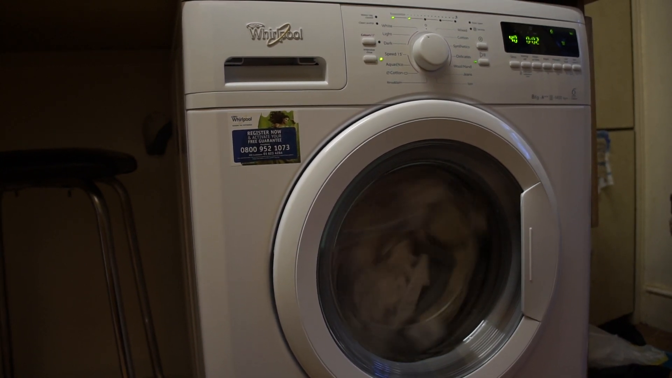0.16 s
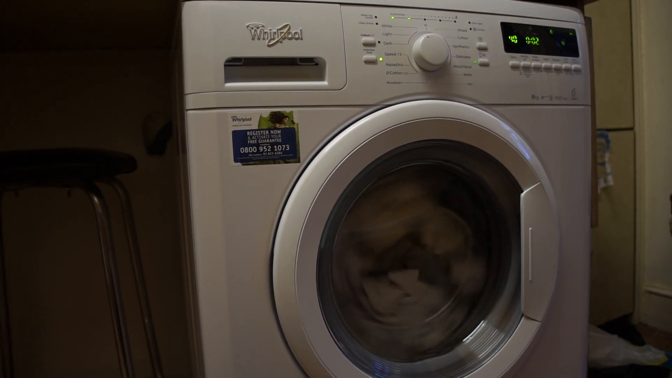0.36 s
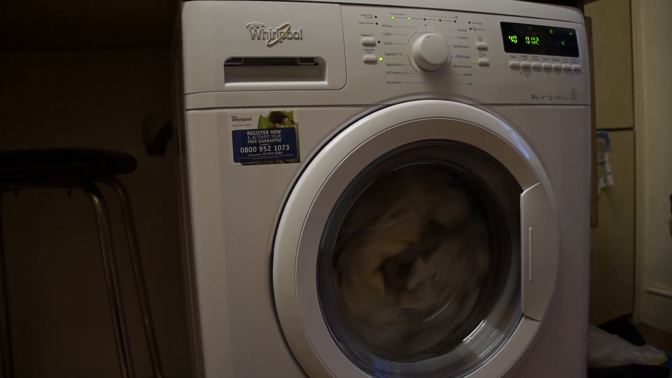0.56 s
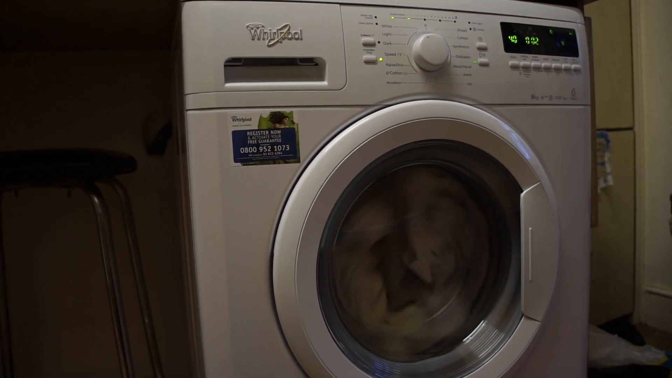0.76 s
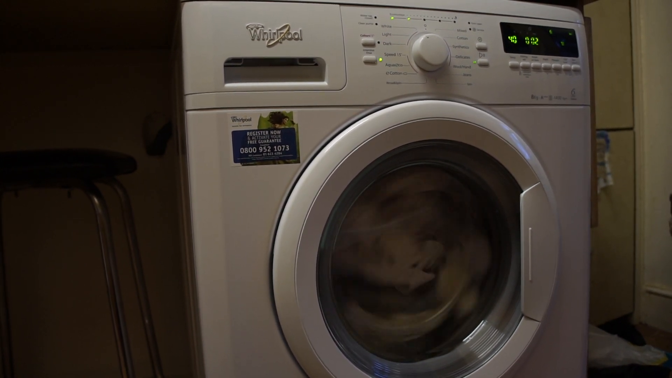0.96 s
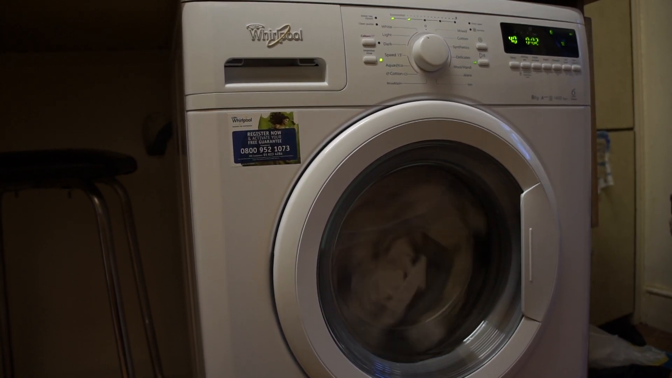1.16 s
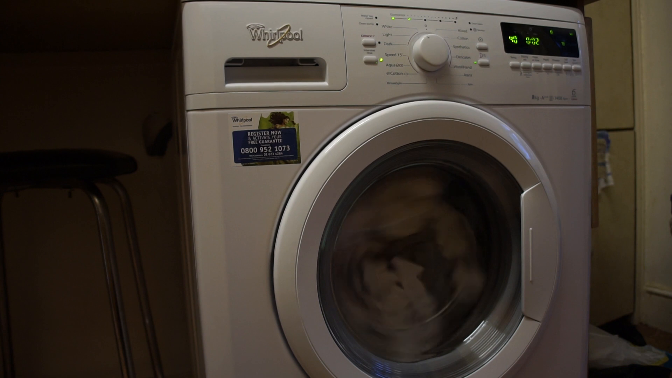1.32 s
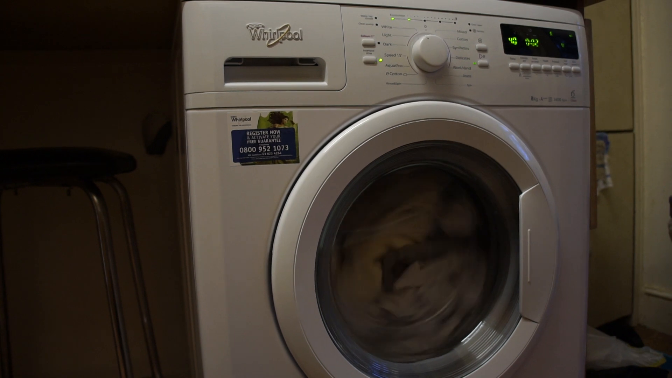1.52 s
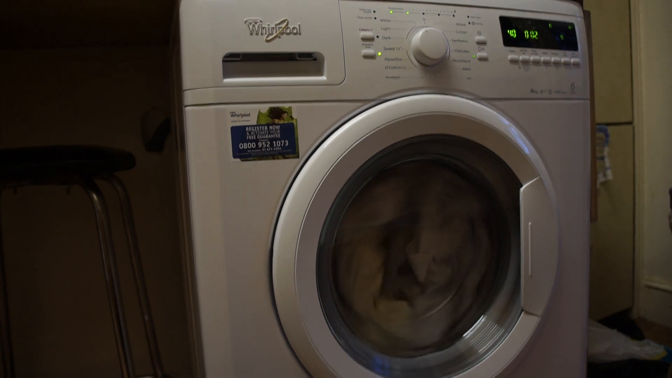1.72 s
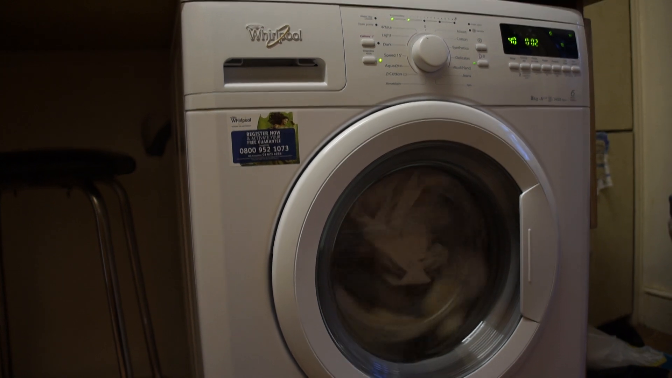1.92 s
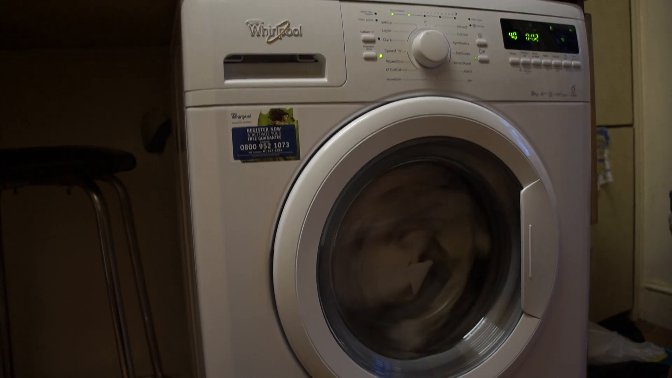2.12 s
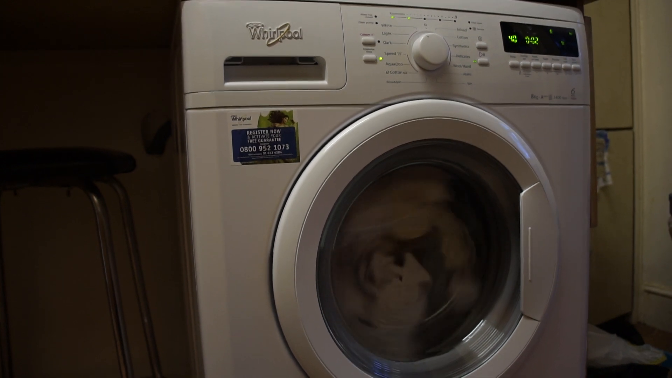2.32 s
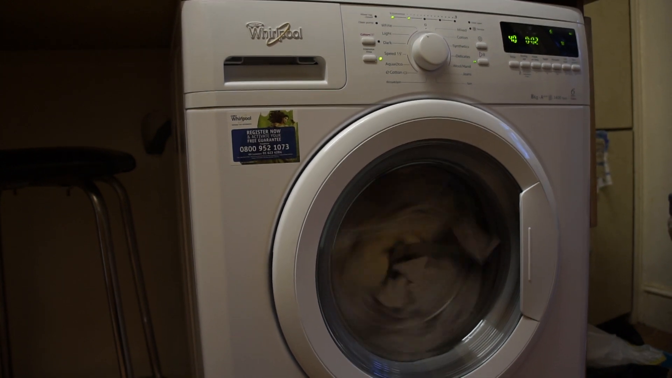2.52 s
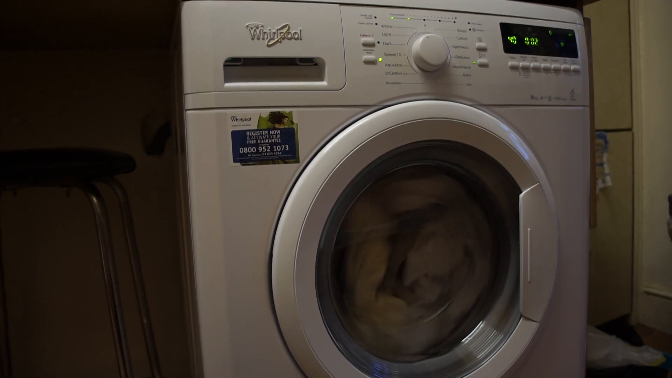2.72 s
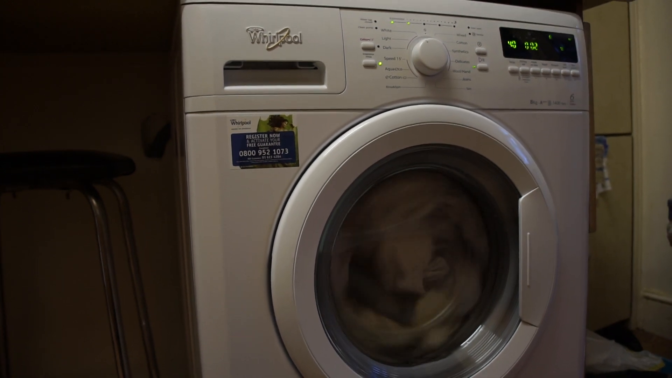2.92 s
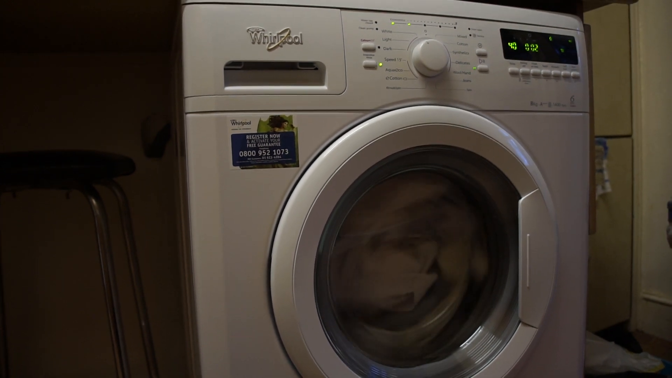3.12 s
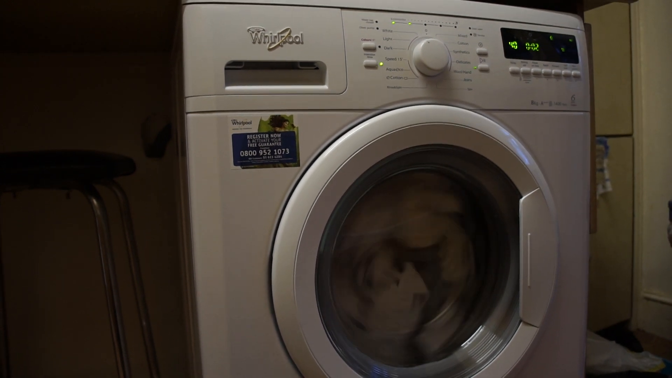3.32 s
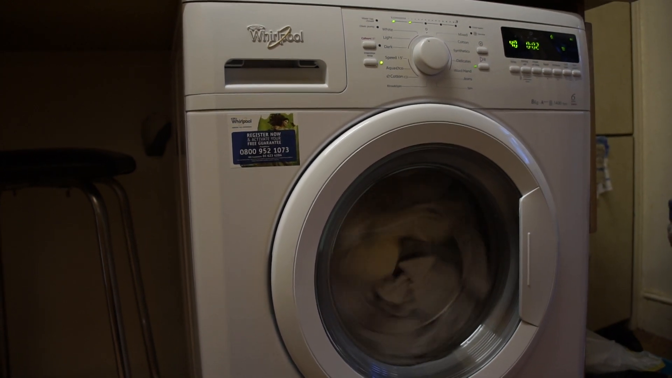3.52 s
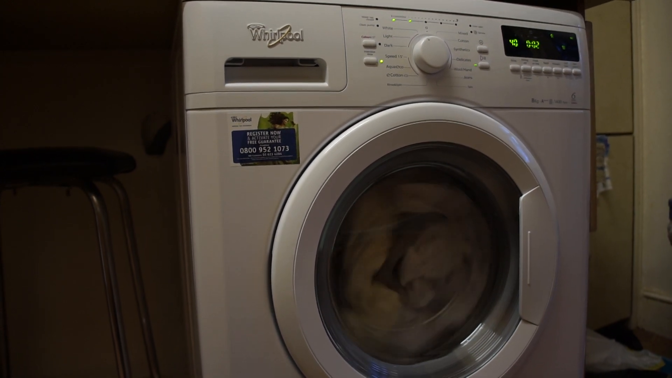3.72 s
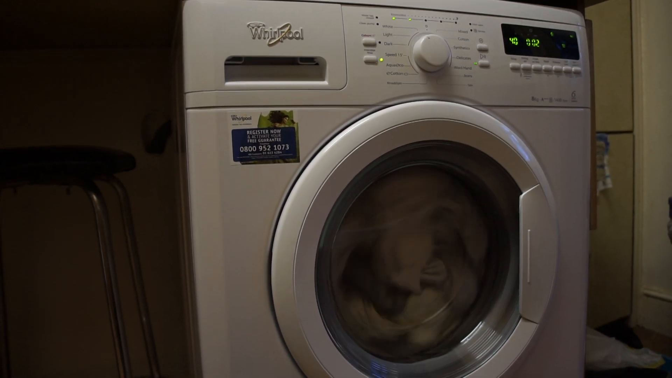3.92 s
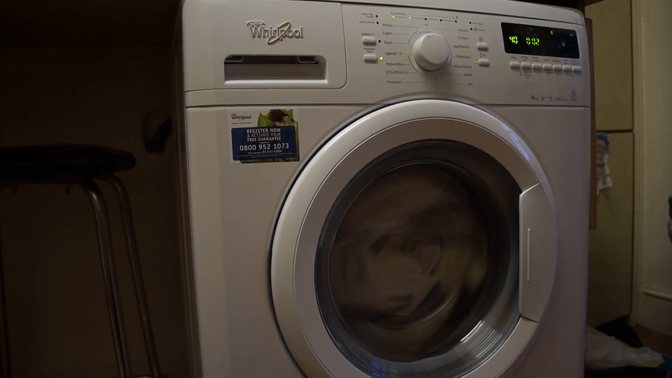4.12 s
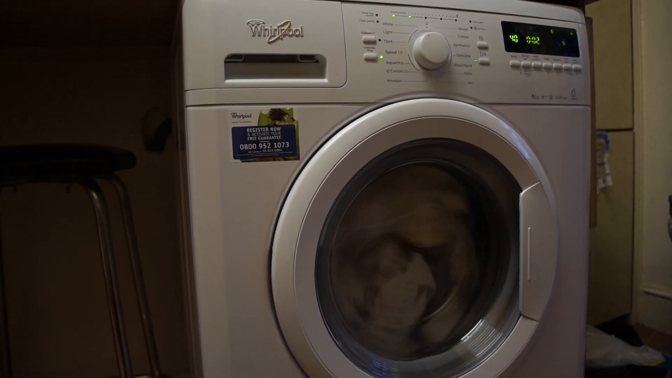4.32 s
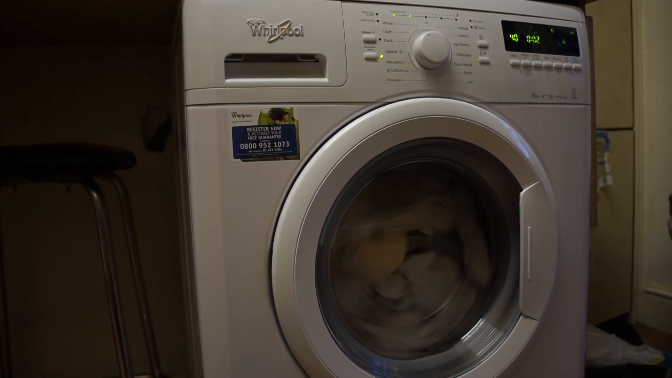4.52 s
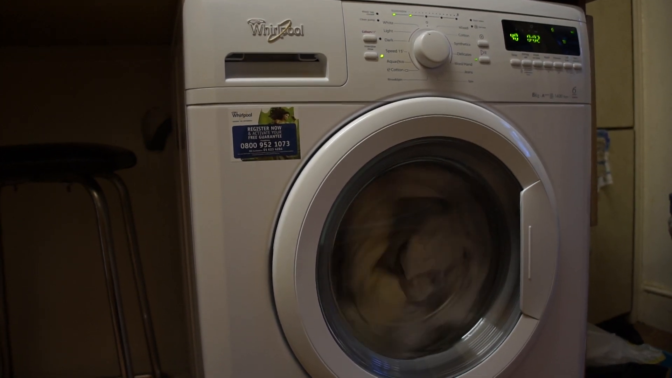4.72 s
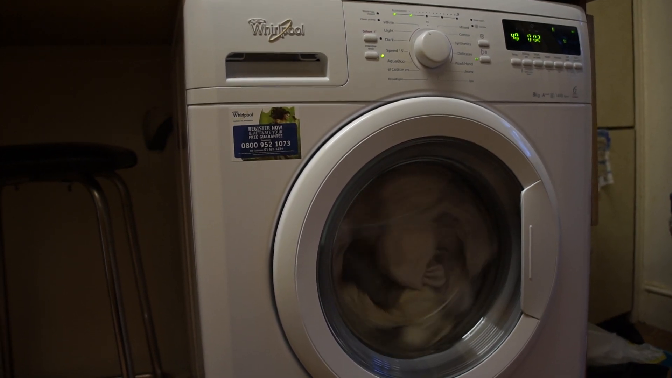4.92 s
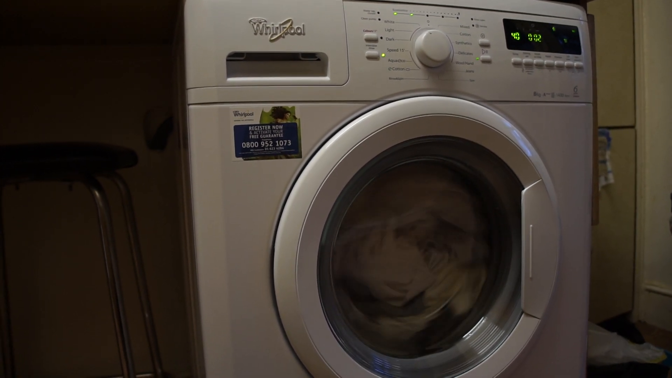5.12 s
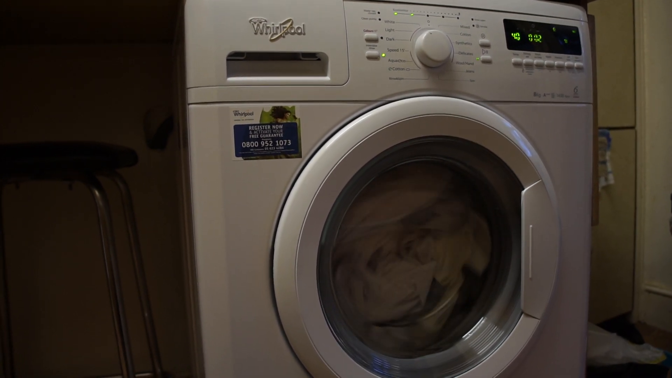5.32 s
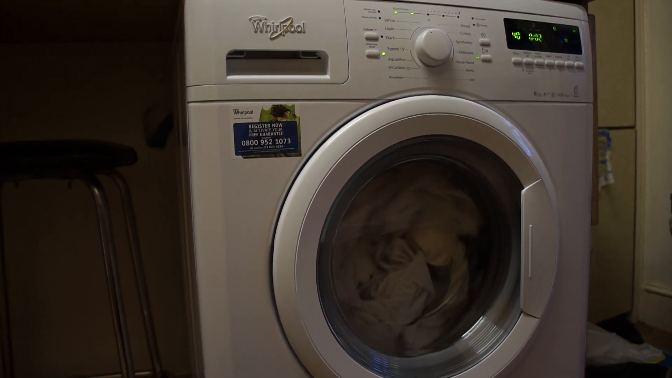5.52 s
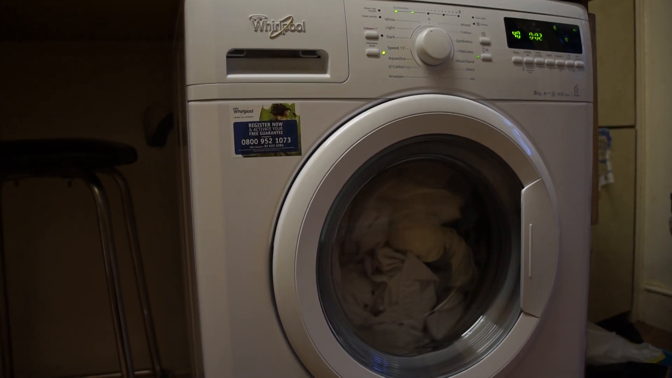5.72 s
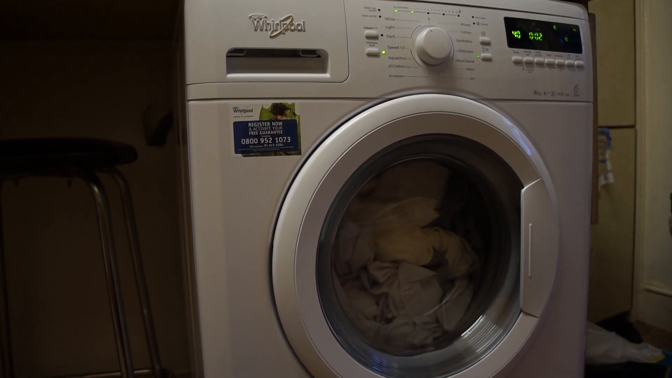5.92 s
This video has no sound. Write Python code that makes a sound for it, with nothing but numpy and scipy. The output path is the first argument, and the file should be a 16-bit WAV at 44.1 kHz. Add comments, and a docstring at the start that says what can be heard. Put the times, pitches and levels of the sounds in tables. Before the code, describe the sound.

Buzzing motor hum and a wavering nasal whine with metallic whistle and cloth swishes, then sudden power-off, a short coasting rustle and a dull thud.

```python
"""A motor hums and whines as a front-loading washing machine turns its wet load, then its power cuts out.
Chopped mains current makes the hum; the whine follows a rotor that sags as the load is lifted,
and swells where its pitch meets a mode of the cabinet. Shaped noise makes the cloth swish, rub and thud.
After the cut the drum noise sinks over about a second; one thud comes early, one just after the coast.
A low murmur of tub and room lies underneath."""
import sys
import numpy as np
from scipy.fft import rfft, irfft, next_fast_len
from scipy.io import wavfile
from scipy.ndimage import uniform_filter1d, map_coordinates

SR = 44100
rng = np.random.default_rng(int(sys.argv[2]) if len(sys.argv) > 2 else 0)


def transcribe(u):
    """Save the signal u as a 16-bit wav file named by the first command-line argument.

    u: samples, shape (n,) or (channels, n), limited to [-1, 1]; the rate is SR.
    q: integer samples, one column per channel.
    """
    v = np.clip(np.atleast_2d(u).T, -1, 1)
    q = np.round(v * 32767).astype(np.int16)
    wavfile.write(sys.argv[1], SR, q)


N = 266937
T = np.arange(N) / SR  # time [s]

MAINS_HZ = 50
CUT_S = 4.69  # the motor current stops
COAST_S = 1.07  # from the cut until the drum rests


def amp(db):
    """Decibels to gain."""
    return 10 ** (np.asarray(db) / 20)


def unit(x):
    """Scale to rms 1."""
    return x / np.sqrt(np.mean(x ** 2) + 1e-20)


def along(points, hz):
    """Read a curve of (frequency [Hz], value) points on a log frequency axis."""
    f, v = np.transpose(points)
    return np.interp(np.log(hz + 1), np.log(f + 1), v)


def curves(rows):
    """One value per sample for each column after the time."""
    s, *columns = np.transpose(rows)
    return [np.interp(T, s, column) for column in columns]


def wobble(rate):
    """A smooth random curve, rate knots a second."""
    return map_coordinates(rng.standard_normal(2048), [T * rate], mode="wrap")


def filtered(x, response):
    """x times a complex response of frequency, zero-padded so that tails do not wrap round."""
    m = next_fast_len(N + SR // 2)
    return irfft(rfft(x, m) * response(np.fft.rfftfreq(m, 1 / SR)), m)[..., :N]


def resonate(x, modes):
    """Ring x through parallel resonances (frequency [Hz], width [Hz], level [dB]) of alternating sign."""
    def response(f):
        total = 0
        for k, (centre, width, db) in enumerate(modes):
            damping = 1j * f * width
            total = total + (-1) ** k * amp(db) * damping / (centre * centre - f * f + damping)
        return total
    return filtered(x, response)


# stereo width of every noise: (frequency [Hz], left-right likeness [-1 to 1])
STEREO_LIKENESS = [(30, 0.99), (120, 0.88), (250, 0.8), (600, 0.6), (1200, 0.16), (2500, 0.14),
                   (4500, -0.12), (15000, -0.05)]


def noise(spectrum):
    """Stereo noise of rms 1: alike in the bass, nearly unrelated in the treble."""
    def mid_side(hz):
        turn = np.arccos(np.clip(along(STEREO_LIKENESS, hz), -1, 1)) / 2
        return amp(along(spectrum, hz)) * [np.cos(turn), np.sin(turn)]
    mid, side = filtered(rng.standard_normal((2, N)), mid_side)
    return unit(np.array([mid + side, mid - side]))


def tone(cycles, waver_db, spread):
    """A wavering line; the room brings it to the two ears at slightly different phases [rad]."""
    phase = 2 * np.pi * (cycles + rng.random())
    ears = spread * rng.choice([-1, 1]) * np.array([[1], [-1]])
    return amp(waver_db * wobble(9)) * np.sin(phase + ears) * np.sqrt(2)


def powered(fade_s):
    """1 while current flows, then a quick fade."""
    return np.exp(-np.maximum(T - CUT_S, 0) / fade_s)


def coasting(drop_db, fade_s, fall_db, bend):
    """Change of level [dB] after the cut: a quick step as the drive goes, then a fall as the drum slows."""
    slowed = np.clip((T - CUT_S) / COAST_S, 0, 1)
    return -drop_db * (1 - powered(fade_s)) - fall_db * slowed ** bend


def swell(s, length):
    """A bell-shaped envelope round time s."""
    return np.exp(-.5 * ((T - s) / length) ** 2)


def blow(s, t60, rise_s):
    """A soft onset at time s and an exponential decay."""
    age = np.maximum(T - s, 0)
    return (1 - np.exp(-age / rise_s)) * np.exp(-np.log(1000) * age / t60)


# rotor speed, sagging as the load is lifted: (time [s], whine pitch [Hz])
WHINE_PITCH = [(0.0, 622.7), (0.11, 633.3), (0.3, 634), (0.47, 624.9), (0.88, 619.4), (1.04, 638),
               (1.27, 637.5), (1.55, 626.5), (1.86, 616.7), (2.05, 622.5), (2.33, 626.2), (2.7, 619.6),
               (2.87, 605.8), (3.04, 620.0), (3.29, 622.7), (3.42, 625), (3.73, 625.7), (3.92, 610),
               (4.15, 626.4), (4.48, 630.7), (4.68, 619.3)]


def rotor_cycles():
    """Add up the whine pitch into a running phase in cycles, shared by all that follows the rotor."""
    pitch_hz, = curves(WHINE_PITCH)
    return np.cumsum(pitch_hz) / SR


# mains hum, before its trim: (multiple of the mains frequency [ratio], level [dB])
HUM_LINES = [(2, -66), (4, -47), (5, -62), (6, -53), (7, -53), (8, -48.3), (9, -62), (10, -60), (11, -52.5),
             (12, -63), (14, -61), (15, -62), (17, -70), (32, -68), (34, -67), (36, -58.5), (46, -69),
             (52, -71), (60, -71)]
# the hum line that beats with the whine, before its trim: (time [s], level [dB])
BEAT_LEVEL = [(0.1, -44), (0.11, -37), (0.38, -37.5), (0.43, -41.5), (0.59, -32), (0.99, -42),
              (1.01, -35.5), (2.39, -44), (3.86, -34.5), (3.88, -51), (4.04, -39), (4.51, -37.5),
              (4.53, -52), (4.66, -46)]


def hum():
    """Chopped current shakes the stator; the 13th harmonic lies by the panel's resonance and beats with the whine."""
    lines = sum(amp(db) * tone(k * MAINS_HZ * T, waver_db=0.1, spread=0.044) for k, db in HUM_LINES)
    beat_db, = curves(BEAT_LEVEL)
    near_panel = 13 * MAINS_HZ * T + .05 * wobble(12)
    beat = amp(beat_db - .5) * tone(near_panel, waver_db=2.5, spread=0.2)
    return amp(-0.6) * lines * powered(fade_s=0.014) + beat * powered(fade_s=0.052)


# cabinet modes that lift a gliding line: (frequency [Hz], width [Hz], full lift [dB])
CABINET_MODES = [(336, 9, 10), (620.5, 7, 11.5), (629.5, 5, 5), (635.5, 13, 14.2), (712, 12, 12.5),
                 (821, 16, 19), (1503, 30, 7), (1904, 30, 16.5), (2016, 28, 18)]
RING_S = 0.091  # the lift is averaged over this time


def lift_db(cycles):
    """How much the cabinet raises a line at its pitch of the moment; a quick crossing rings it only partly."""
    hz = np.gradient(cycles) * SR
    lift = sum(top / (1 + (2 * (hz - centre) / width) ** 2) for centre, width, top in CABINET_MODES)
    return uniform_filter1d(lift, size=max(int(RING_S * SR), 1))


def rotor_lines(table, cycles, waver_db, spread):
    """Rotor harmonics shifted by multiples of the mains; each swells when it meets a cabinet mode."""
    total = 0
    for order, offset, db in table:
        line = order * cycles + offset * MAINS_HZ * T
        jittered = line + 0.024 * wobble(30)
        total = total + amp(db + lift_db(line)) * tone(jittered, waver_db, spread)
    return total


# lines round the whine, before trim and cabinet lift:
# (multiple of the whine [ratio], offset [mains multiples], level [dB])
WHINE_SIDEBANDS = [(1, -6, -58), (1, -5, -56), (1, -4, -52), (1, -2, -57.5), (1, -1, -55), (1, 1, -57),
                   (1, 2, -63), (1, 3, -65), (1, 6, -69), (1, 21, -63), (2, -12, -57.5), (2, -8, -69),
                   (2, -4, -71), (2, -2, -69), (2, 2, -70), (2, 5, -70), (2, 7, -65), (2, 9, -64),
                   (2, 15, -66), (2, 19, -66), (2, 21, -66), (2, 27, -70), (3, -8, -66), (3, 0, -69),
                   (3, 2, -71), (3, 3, -67), (3, 4, -65), (3, 6, -67), (5, -3, -69)]
WHINE_DB, SIDEBAND_DB = -46.5, 1  # whine level before cabinet lift, trim of the sidebands


def whine(cycles):
    """The rotor's tone; the pulsing current puts sidebands round it at mains spacing."""
    jitter = .028 * wobble(35)
    carrier = amp(WHINE_DB + lift_db(cycles)) * tone(cycles + jitter, waver_db=0.8, spread=0.14)
    sides = amp(SIDEBAND_DB) * rotor_lines(WHINE_SIDEBANDS, cycles, waver_db=1.9, spread=0.3)
    return carrier * powered(fade_s=0.046) + sides * powered(fade_s=0.024)


# the pair that whistles in the steel:
# (multiple of the whine [ratio], offset [mains multiples], relative level [dB])
WHISTLE_PAIR = [(4, -12, 0), (4, -10, 0)]
WHISTLE_DB = -58.5  # before cabinet lift
# thin steel parts round the motor: (frequency [Hz], width [Hz], relative level [dB])
STEEL_MODES = [(1440, 44, -22), (1740, 36, -35), (1850, 25, -1), (1988, 62, -4), (2165, 27, -16)]
# the two longest-ringing modes of the steel: (frequency [Hz], width [Hz], relative level [dB])
LONG_STEEL_MODES = [(1901, 12, -4), (2011, 16, 0)]
# colour of the rubbing rasp, also heard in running_noise: (frequency [Hz], relative level [dB])
RASP_COLOUR = [(700, -52), (1000, -7.5), (1300, -1), (1550, 0), (1800, 2), (2100, 3), (2400, 1),
               (2750, -0.5), (3050, -0.5), (3500, -9.5), (4500, -11), (7000, -30)]


def steel(cycles):
    """Two sidebands whistle whenever the speed tunes them to the steel; brush friction rings all its modes."""
    whistle = amp(WHISTLE_DB) * rotor_lines(WHISTLE_PAIR, cycles, waver_db=4.1, spread=0.11)
    friction = noise(RASP_COLOUR) * amp(3.2 * wobble(18))
    scrape = amp(-50.5) * unit(resonate(friction, STEEL_MODES))
    ring = amp(-48) * unit(resonate(friction, LONG_STEEL_MODES))
    flutter = amp(1.67 * wobble(29.974))
    return ((whistle + scrape) * powered(fade_s=0.031) + ring * powered(fade_s=0.077)) * flutter


# wet cloth sliding in the drum: (time [s], level [dB], length [s])
SWISH_EVENTS = [(0.246, -47, 0.064), (1.28, -43.5, 0.051), (2.094, -44, 0.0069), (2.273, -47.5, 0.077),
                (3.277, -47.5, 0.057), (4.246, -45.5, 0.044), (4.667, -51, 0.022), (5.248, -47, 0.047),
                (5.825, -54, 0.029)]
# colour of sliding cloth, which also drives the shell clank: (frequency [Hz], relative level [dB])
SWISH_COLOUR = [(200, -26), (600, 4.5), (1500, -2.5), (3000, 0), (5200, -2), (7500, -12), (15000, -11)]


def cloth_slide():
    """Wet cloth slides in the drum: bell-shaped swells of one soft noise."""
    return noise(SWISH_COLOUR) * sum(amp(db) * swell(s, length) for s, db, length in SWISH_EVENTS)


# the load falling on the drum: (time [s], thud level [dB], shell clank level [dB], t60 [s])
THUD_EVENTS = [(1.267, -36.5, -39, 0.5), (6.005, -38.5, -41, 0.64)]
# colour of the thud: (frequency [Hz], relative level [dB])
THUD_COLOUR = [(20, -6.5), (45, -22), (85, -4.5), (135, -18), (220, -8.5), (400, -17), (800, -20),
               (1300, -24), (2400, -28.5), (6000, -33)]
# the drum shell under a blow: (frequency [Hz], width [Hz], relative level [dB])
SHELL_MODES = [(1440, 73, -2.5), (1660, 220, 1), (2020, 120, -3), (2190, 200, -8)]


def load_fall():
    """The load drops on the drum: a dull thud and the clank of the shell decay together."""
    thud = noise(THUD_COLOUR)
    clank = unit(resonate(noise(SWISH_COLOUR), SHELL_MODES))
    total = 0
    for s, thud_db, clank_db, t60 in THUD_EVENTS:
        body = amp(thud_db) * thud + amp(clank_db) * clank
        total = total + body * blow(s, t60, rise_s=0.00067)
    return total


# the tub on its springs and the cabinet it rings: (time [s], level [dB], pitch [Hz], t60 [s])
BUMP_EVENTS = [(1.283, -45, 86, .55), (1.28, -43, 134, .3), (4.845, -47, 60, .14), (5.04, -51, 190, .4),
               (5.03, -49, 632, .4), (5.4, -50, 55, .18), (5.52, -56, 50, .1), (5.98, -45, 45, .4)]


def tub_bumps():
    """The tub bumps on its springs and rings the cabinet: decaying sines."""
    total = 0
    for s, db, hz, t60 in BUMP_EVENTS:
        total = total + amp(db) * blow(s, t60, rise_s=0.0024) * np.sin(2 * np.pi * hz * (T - s))
    return total


# cloth squeaking on the door seal: (time [s], level [dB], pitch [Hz], length [s])
SQUEAK_EVENTS = [(2.213, -44.5, 1080, 0.0062), (2.31, -49, 1050, .006), (5.087, -52, 1046, 0.007)]


def squeaks():
    """Cloth squeaks on the seal: short stick-slip notes of unsteady pitch."""
    slip = .12 * wobble(160)
    total = 0
    for s, db, hz, length in SQUEAK_EVENTS:
        note = np.sqrt(2) * np.sin(2 * np.pi * (hz * T + slip))
        total = total + amp(db) * swell(s, length) * note
    return total


# low drum rumble: (frequency [Hz], relative level [dB])
RUMBLE_COLOUR = [(20, -41), (50, -48), (90, -7.5), (130, -16.5), (200, -0.5), (260, -4.5), (330, -2),
                 (470, -7.5), (560, -4.5), (720, -6.5), (850, -8.5), (1100, -14.5), (1600, -28)]
# the side panel: (frequency [Hz], width [Hz], relative level [dB])
PANEL_MODES = [(630.4, 24, 0)]


def running_noise():
    """Drum and bearings rub on while the machine coasts, and keep the side panel ringing."""
    rumble_db = -48.5 + 1.3 * wobble(4.1) + coasting(drop_db=3, fade_s=.07, fall_db=10.5, bend=2.1)
    rasp_db = -46.8 + 0.98 * wobble(10) + coasting(drop_db=7.5, fade_s=0.057, fall_db=6.5, bend=1.0)
    panel_db = -42.5 + 1.4 * wobble(3.98) + coasting(drop_db=9.5, fade_s=0.045, fall_db=9.0, bend=1.0)
    panel_drive = noise([(400, 1.5), (600, -6.5), (680, 1.5), (900, -20.0)])
    panel = unit(resonate(panel_drive, PANEL_MODES))
    return amp(rumble_db) * noise(RUMBLE_COLOUR) + amp(rasp_db) * noise(RASP_COLOUR) + amp(panel_db) * panel


# cloth hiss: (frequency [Hz], relative level [dB])
HISS_COLOUR = [(1500, -10.5), (3200, -1), (4000, 1), (4700, 6), (5400, 3), (6200, 0.5), (7400, -1),
               (9000, -5), (15000, -13)]
# the highest fizz: (frequency [Hz], relative level [dB])
FIZZ_COLOUR = [(6000, -32), (8200, -3), (9200, -2.5), (9450, 2), (9950, -0.5), (10400, -3), (11300, -0.5),
               (12600, -1), (13250, 3.5), (13800, -5.5), (14600, 2.5), (15700, -17)]


def rubbing():
    """Wet cloth hisses on the steel; the highest fizz sinks much further as the drum slows."""
    # the negative drop lifts the hiss slightly at the cut
    hiss_db = -52.5 + 0.4 * wobble(14) + coasting(drop_db=-0.3, fade_s=.1, fall_db=3.5, bend=3.3)
    fizz_db = -51 + 0.85 * wobble(8.2) + coasting(drop_db=2.3, fade_s=0.091, fall_db=7.5, bend=3.4)
    return amp(hiss_db) * noise(HISS_COLOUR) + amp(fizz_db) * noise(FIZZ_COLOUR)


# low murmur of tub and room: (frequency [Hz], relative level [dB])
ROOM_COLOUR = [(12, -40), (20, -15), (54, -5), (98, -12), (129, -8.5), (147, -2.5), (181, -8), (293, -1),
               (332, -8), (527, -11.5), (649, -30), (871, -16.5), (2240, -31), (3150, -11), (3900, -21.5),
               (6600, -120)]


def room():
    """Steady noise, strongest in the low range, for the murmur of tub and room."""
    return amp(-54) * noise(ROOM_COLOUR)


def scene():
    """Motor, load and drum over the low murmur of tub and room."""
    cycles = rotor_cycles()
    motor = hum() + whine(cycles) + steel(cycles)
    laundry = cloth_slide() + load_fall() + tub_bumps() + squeaks()
    return motor + laundry + running_noise() + rubbing() + room()


# colour of the stereo balance: (frequency [Hz], left minus right [dB])
STEREO_LEAN = [(120, -1.2), (330, 2), (630, -1.1), (1200, 2.5), (2000, 0.5), (5000, 1.8), (9000, 1.5),
               (14000, 4)]
TOP_HZ = 15800  # band limit


def record(dry):
    """The two microphones differ a little in colour and keep nothing above the band limit."""
    def response(hz):
        lean_db = along(STEREO_LEAN, hz) * np.array([[.5], [-.5]])
        return amp(lean_db) * (hz < TOP_HZ)
    return filtered(dry, response)


dry = scene()
out = record(dry)
transcribe(out)
```